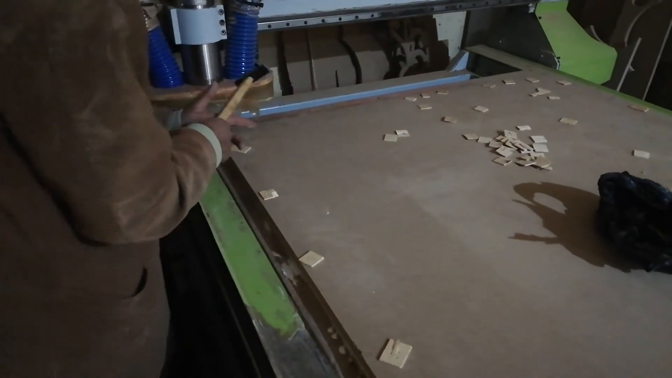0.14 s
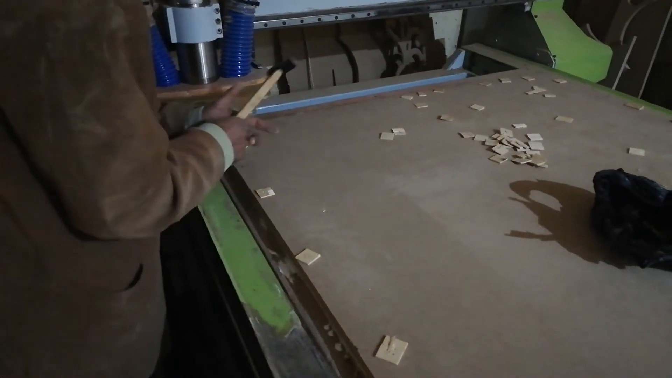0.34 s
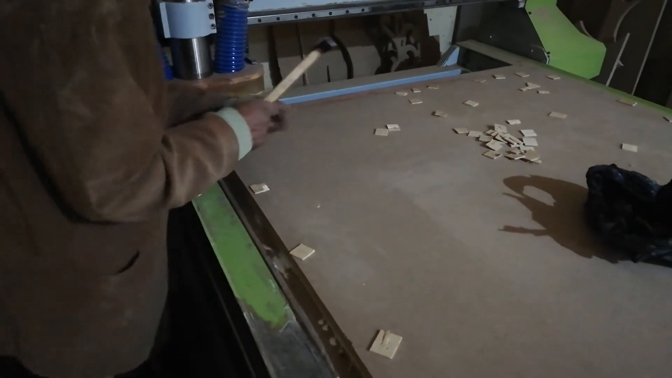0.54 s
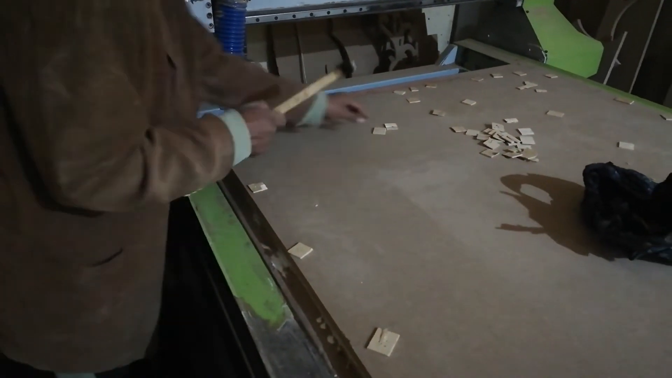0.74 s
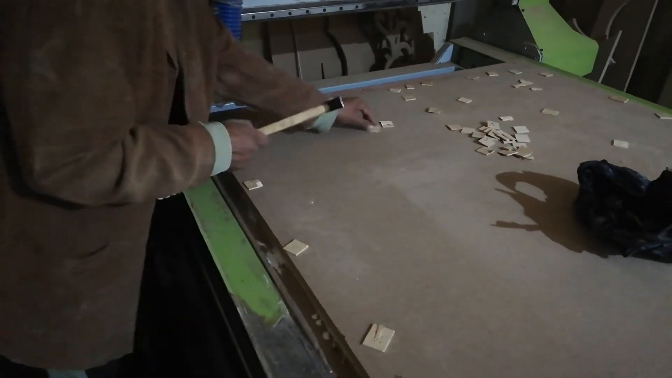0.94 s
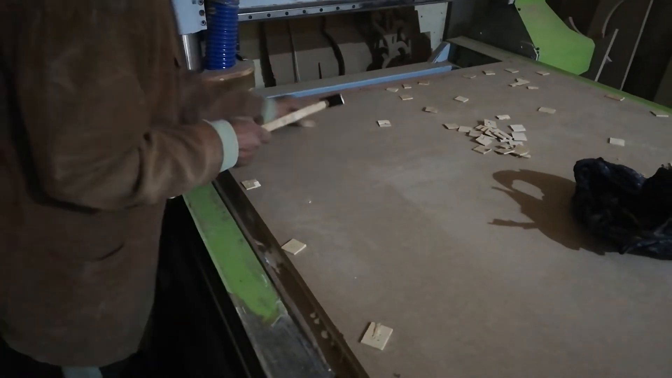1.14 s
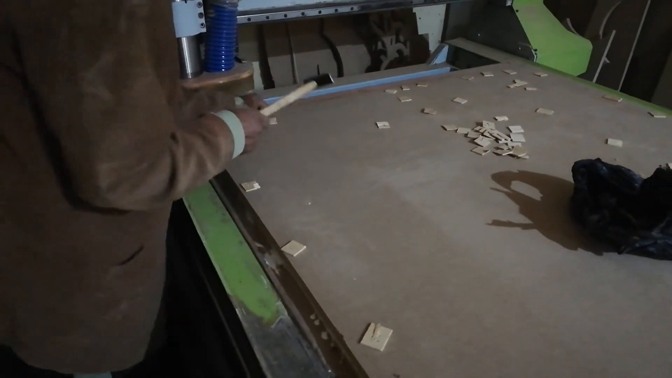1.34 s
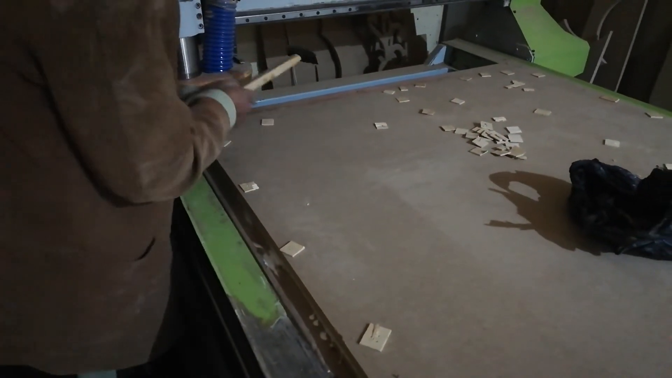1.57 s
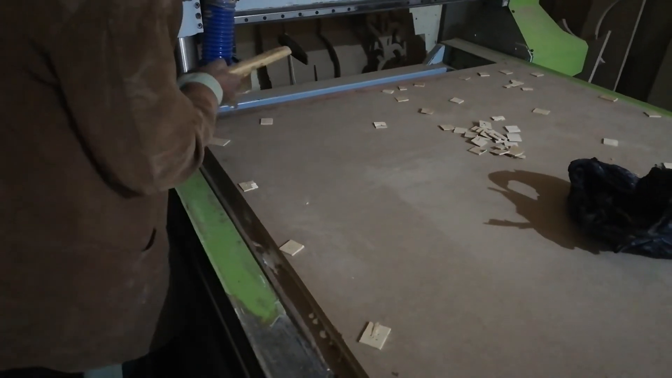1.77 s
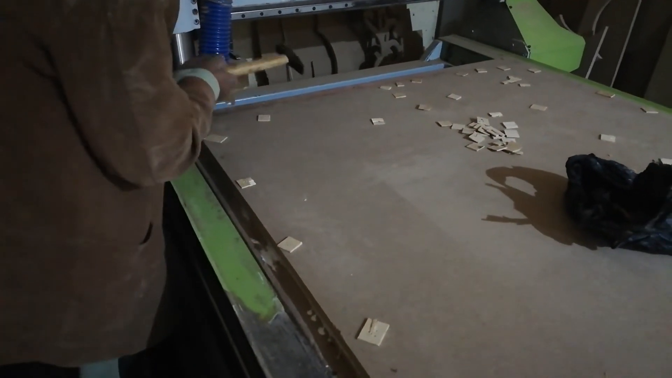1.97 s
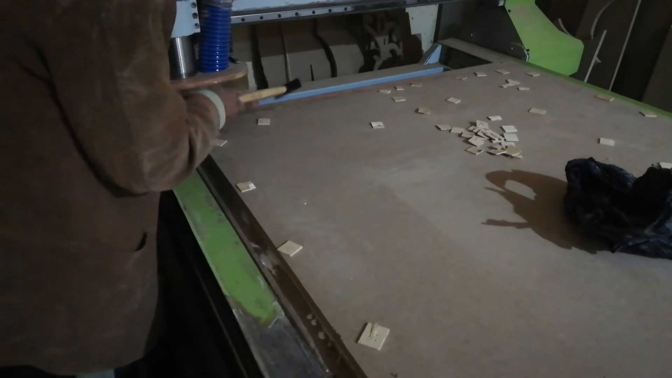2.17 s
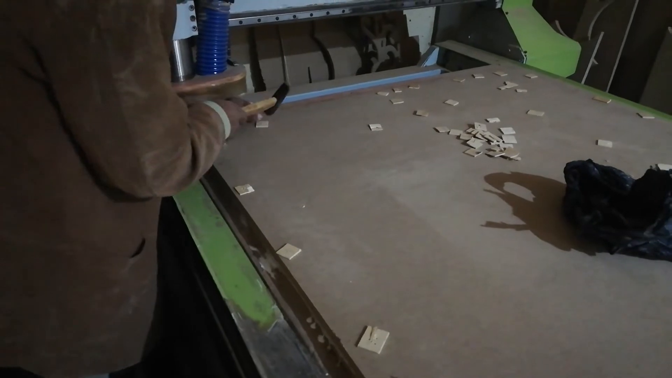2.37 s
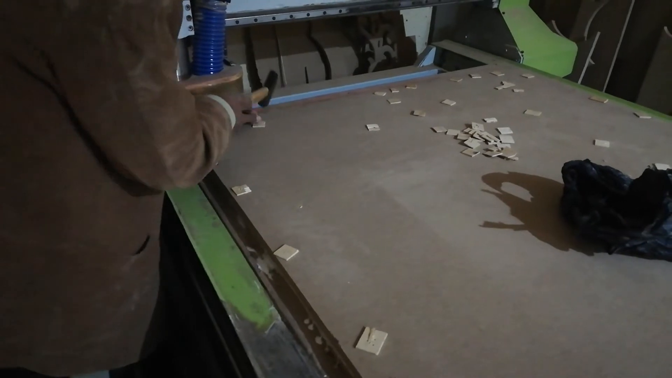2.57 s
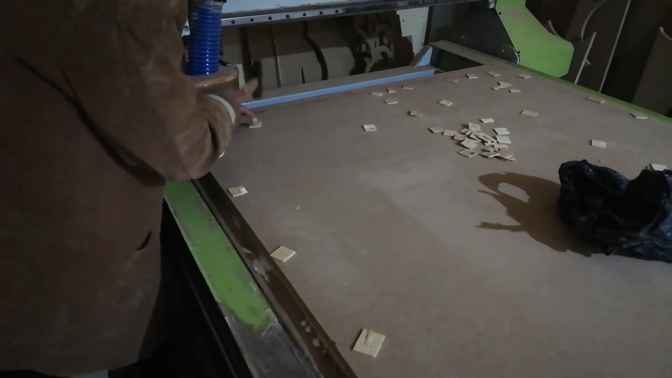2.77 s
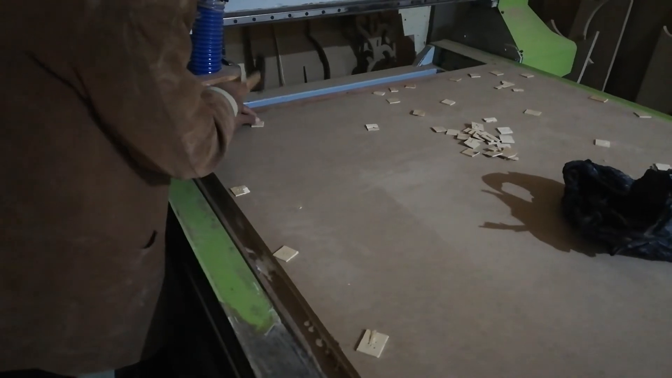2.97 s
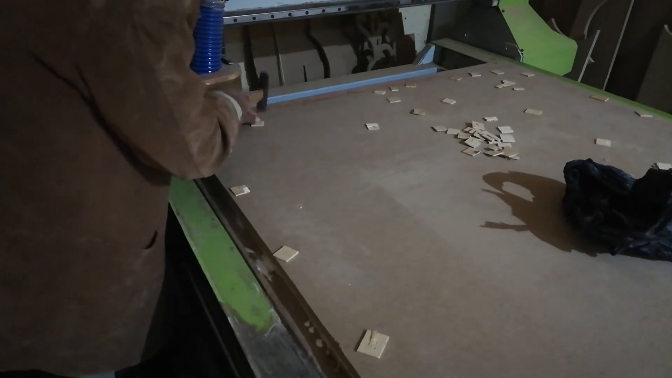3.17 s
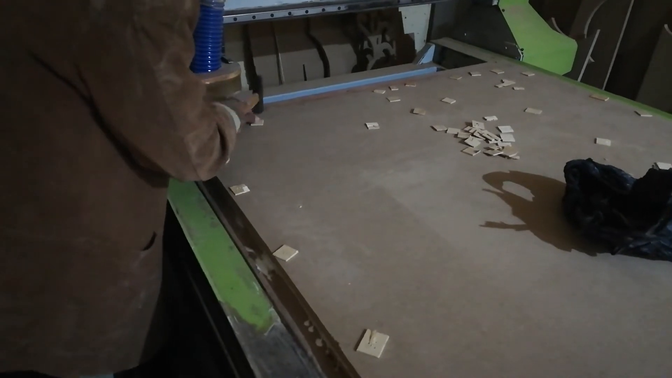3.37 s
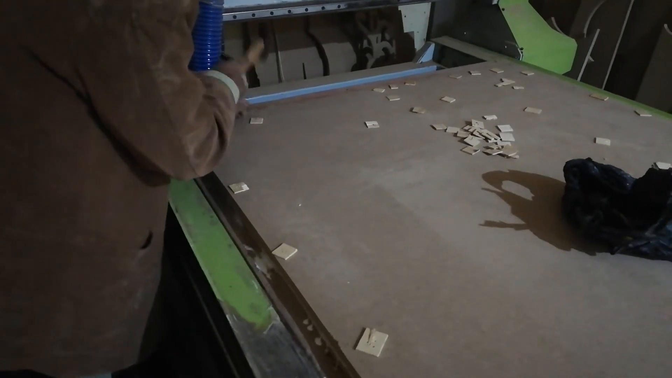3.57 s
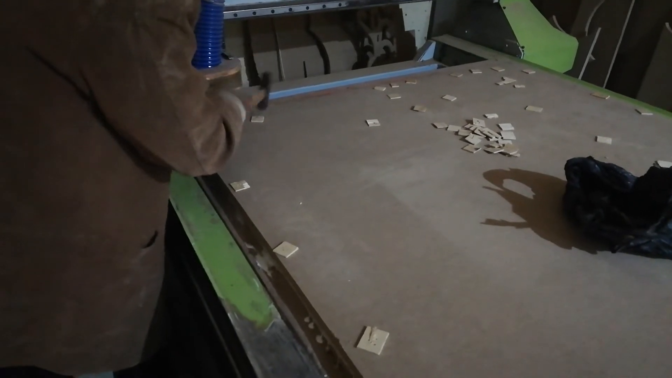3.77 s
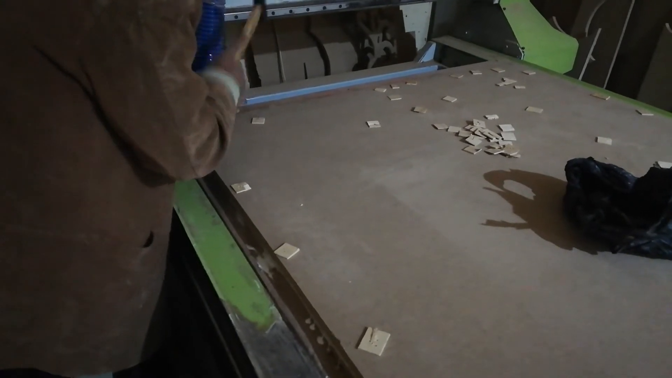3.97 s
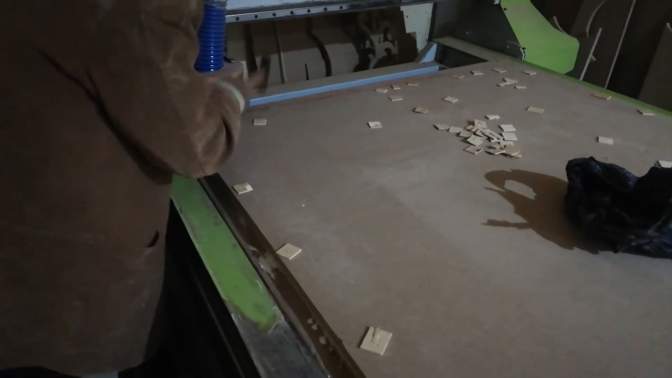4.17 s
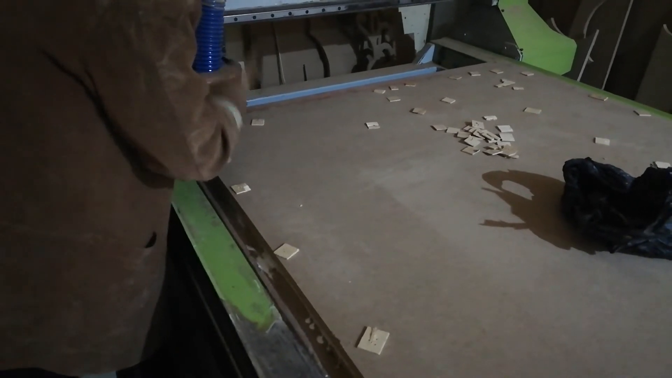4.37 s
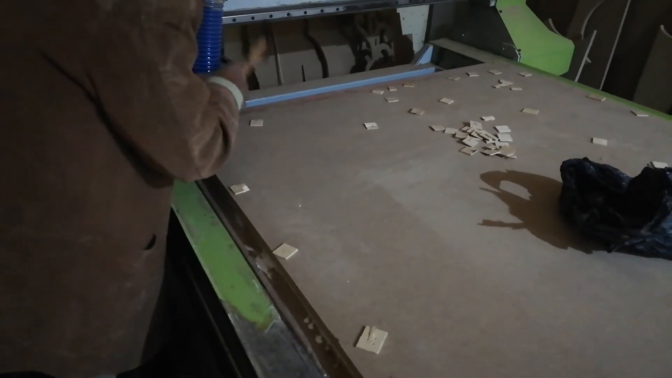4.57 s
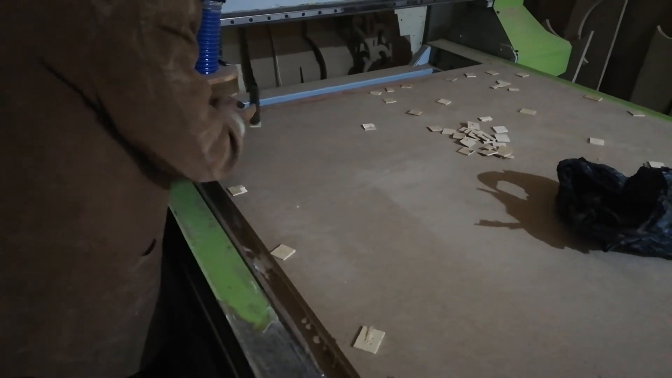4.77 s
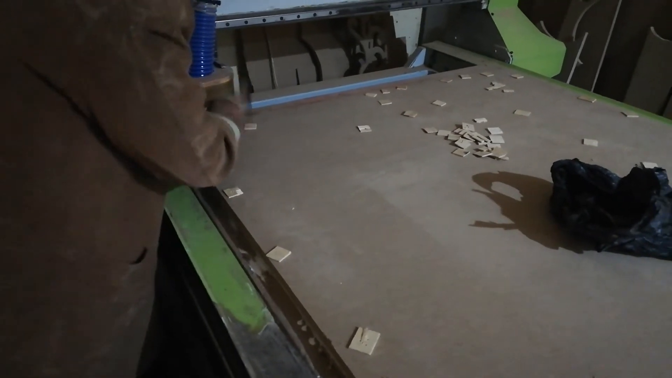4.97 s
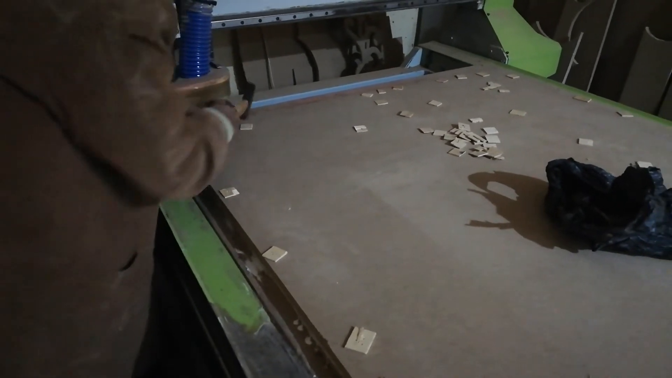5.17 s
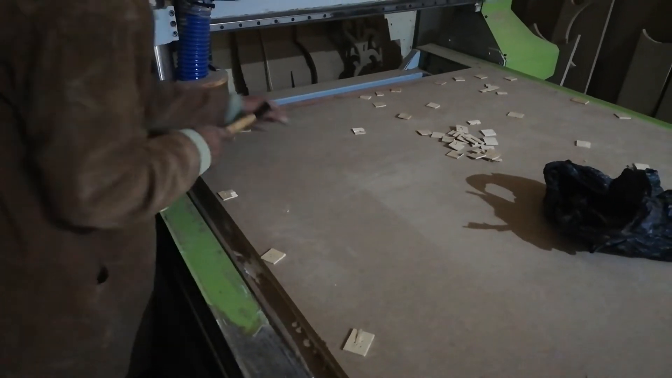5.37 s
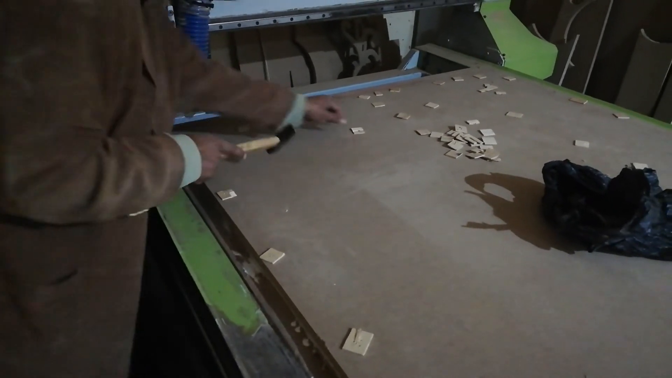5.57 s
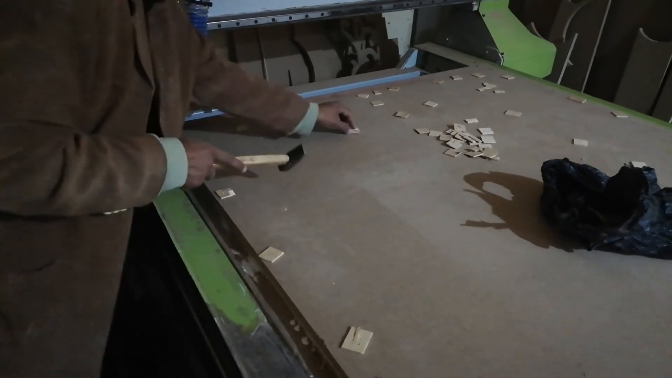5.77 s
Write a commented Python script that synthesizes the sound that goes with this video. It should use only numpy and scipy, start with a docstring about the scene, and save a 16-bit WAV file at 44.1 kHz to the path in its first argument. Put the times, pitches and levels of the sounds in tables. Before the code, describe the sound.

A quiet, unsteady low workshop hum with soft hiss runs throughout. Around 0.4 s a sleeve gives a very faint swish; another gentle rustle rises from about 1.3 s, with a tiny wooden tick near 1.65 s and a clearer brush at 1.8 s. From 2.06 s a small steel hammer strikes a wooden board eight times, roughly every third of a second, until 4.3 s. The first is a faint tap, the next ones firmer, the middle ones hard and bright, the last two heavier, the final one woodiest and deepest. Quick treble echoes and a low, booming room tail follow each. After the decay, faint cloth noise leads to a strong airy sleeve swish at 5.2-5.7 s, a grainy hand rub, a cluster of wooden clicks near 5.4-5.55 s, and soft low floor thuds. Last small ticks come around 5.75 s. The left channel is muffled, the right open; loud blows are compressed.

```python
"""Over steady workshop noise a sleeve swishes, filtered friction noise, and a wooden piece ticks.
From 2 s a small hammer strikes a board on a machine bed eight times: noise bursts and dying modes,
answered by discrete echoes, standing waves and a diffuse tail. Then the sleeve swishes again, the floor
swells as weight shifts, and a hand rubs over the bed while wooden pieces tick as the worker reaches.
Two microphone ports hear this, the left one covered; a gain control ducks both at loud moments."""
import sys
import numpy as np
from scipy import signal
from scipy.fft import rfft, irfft, next_fast_len
from scipy.io import wavfile
from scipy.ndimage import uniform_filter1d

SR = 44100
rng = np.random.default_rng(int(sys.argv[2]) if len(sys.argv) > 2 else 0)


def gain_from_db(level_db):
    """Turn a decibel level (scalar or array-like) into a linear amplitude factor."""
    decades = np.asarray(level_db, float) / 20
    return 10 ** decades


def inscribe(sig):
    """Save sig as 16-bit PCM at rate SR to the path in sys.argv[1].

    A 1-D sig is mono; a 2-D sig holds one channel per row.
    Samples are clipped to [-1, 1] before scaling.
    """
    pcm = np.round(np.clip(np.atleast_2d(sig).T, -1, 1) * 32767)
    wavfile.write(sys.argv[1], SR, pcm.astype(np.int16))


N = 256662  # samples


def read(points, hz):
    """Interpolates a table linearly over log frequency."""
    f, value = np.transpose(points)
    return np.interp(np.log(hz + 1), np.log(f + 1), value)


def shape(x, gain):
    """Linear filtering: multiplies the spectrum by gain(Hz); a real gain adds no delay."""
    size = next_fast_len(x.shape[-1] + 2048)
    return irfft(rfft(x, size) * gain(np.fft.rfftfreq(size, 1 / SR)), size)[..., :x.shape[-1]]


def above(hz, low_hz, order):
    """High-pass magnitude response; order is the power of frequency under the root."""
    return 1 / np.sqrt(1 + (low_hz / (hz + 1)) ** order)


def evened(x):
    """Normalizes the mean power: rms 1."""
    return x / np.sqrt(np.mean(x ** 2) + 1e-20)


def add(mix, s, sound):
    """Superposition: adds a sound to the mix from s seconds on."""
    part = mix[:, round(s * SR):][:, :sound.shape[-1]]
    part += sound[..., :part.shape[1]]


def air():
    """Stationary coloured noise: workshop hum and hiss whose bass fluctuates in lumps."""
    # spectrum of the workshop noise: f/Hz, relative level/dB
    air_spectrum = [(15, -69), (25, -2), (59, -2.5), (92, -11.5), (180, -13), (300, -18.5), (440, -23.5),
                    (600, -23.5), (902, -22.5), (3000, -32), (5000, -35.5), (9500, -36), (16000, -41)]
    hz, t, z = signal.stft(rng.standard_normal((2, N)), SR, nperseg=1024)
    lumps = uniform_filter1d(rng.standard_normal(z.shape[1:]), 4, 0)
    lumps = evened(uniform_filter1d(lumps, 6, 1))
    bass_share = 1 / (1 + (hz[:, None] / 300) ** 2)
    z = z * gain_from_db(read(air_spectrum, hz)[:, None] + 2.4 * lumps * bass_share)
    noise = evened(signal.istft(z, SR, nperseg=1024)[1][:, :N])
    return noise * gain_from_db(-52.5)


def step(db, hz):
    """Damped floor oscillation: weight shifts as a soft low swell."""
    t = np.arange(SR // 4) / SR
    return gain_from_db(db) * np.sin(2 * np.pi * hz * t) * (t / 0.026) * np.exp(1 - t / 0.03)


def friction(t, hiss_db, rub_db, peak_hz):
    """Stick-slip friction: an airy hiss and a grainier rub with a raised band around peak_hz."""
    # colour of the hiss: f/Hz, relative level/dB
    silky = [(1000, -50), (4000, -19), (4700, -18), (5500, -20.5), (6800, -13.5), (7700, -14), (9200, -9.5),
             (10200, -13.5), (12500, -15.5), (16000, -22.5)]
    # colour of the rub: f/Hz, relative level/dB
    rubbing = [(500, -4), (1200, -11), (2300, -5), (4500, -10), (6000, 1), (11000, -15), (16000, -3.5)]
    snags_per_s, snag_decay_s = 500, 0.00061
    snags = (rng.random(len(t)) < snags_per_s / SR) * rng.exponential(1, len(t))
    snags = signal.lfilter([1], [1, -np.exp(-1 / (snag_decay_s * SR))], snags)  # fibres catch and let go
    noise = rng.standard_normal((2, 2, len(t)))
    hiss = evened(shape(noise[0] * (1 + 0.11 * snags), lambda hz: gain_from_db(read(silky, hz))))

    hz, frames, z = signal.stft(noise[1] * (1 + 0.5 * snags), SR, nperseg=256)
    octaves = np.log2((hz[:, None] + 1) / np.interp(frames + t[0], t, peak_hz))
    raised_db = 4.3 * np.exp(-.5 * (octaves / 0.68) ** 2)
    z = z * gain_from_db(read(rubbing, hz)[:, None] + raised_db)
    rub = evened(signal.istft(z, SR, nperseg=256)[1][:, :len(t)])
    faded = (gain_from_db(hiss_db) * hiss + gain_from_db(rub_db) * rub) * signal.windows.tukey(len(t), .04)
    return t[0], faded


def swish(s, db, rise_s, hold_s, fall_s):
    """Friction noise grows with speed: a sleeve speeds up, moves on a little softer, and stops."""
    edge_db, sag_db_per_s = -35, -13.5  # drop towards either end; change from full speed on
    t = np.arange(-rise_s, hold_s + fall_s, 1 / SR)
    ends = (np.minimum(t, 0) / rise_s) ** 2 + (np.maximum(t - hold_s, 0) / fall_s) ** 2
    db = db + edge_db * ends + sag_db_per_s * np.maximum(t, 0)
    return friction(s + t, db, db - 12, np.full(len(t), 2880))  # the rub is the coarser part of the cloth


def slide():
    """Speed-dependent friction: the hand rubs over the bed without the airy hiss, speeds up and slows."""
    # course of the hand: t/s, level/dB, centre of the raised band f/Hz
    hand_course = [(5.15, -60, 2020), (5.33, -51, 3800), (5.43, -37.5, 4300), (5.49, -39.5, 2800),
                   (5.61, -40, 2100), (5.72, -53, 2030), (5.82, -66, 3040)]
    s, db, hz = np.transpose(hand_course)
    t = np.arange(s[0], s[-1], 1 / SR)
    return friction(t, -np.inf, np.interp(t, s, db), np.interp(t, s, hz))


def piece(db, hz):
    """Impact on a small resonator: a wooden piece gives a broad crack and one short ring."""
    t = np.arange(1500) / SR
    crack = shape(rng.standard_normal(len(t)) * np.exp(-t / 0.0022),
                  lambda hz: above(hz, 1500, order=4) / np.sqrt(1 + (hz / 6000) ** 2))
    tone = np.sin(2 * np.pi * hz * t) * np.exp(-t / 0.0049)
    return gain_from_db(db) * (0.5 * crack + 0.4 * tone)


def hall():
    """Diffuse reverberation: two noise tails build up fast and die band by band."""
    # reverberation time: f/Hz, T60/s
    hall_t60 = [(60, 1.006), (160, 1.12), (280, 0.55), (420, 0.65), (1100, 0.69), (2900, 0.63),
                (6000, 0.57), (9000, 0.46), (12000, 0.3), (15000, 0.31)]
    # colour of the tail: f/Hz, relative level/dB
    hall_colour = [(50, -0.5), (150, 4.5), (400, 14.5), (1000, 5), (3000, 1.5), (6000, -2), (9000, 0),
                   (15000, -9)]
    far_db, far_t60, build_up_s = -26, 1.5, 0.0051
    hz, t, z = signal.stft(rng.standard_normal((2, 2 * SR)), SR, nperseg=256)
    near = gain_from_db(-60 * t / read(hall_t60, hz)[:, None])
    # the far end of the workshop answers faintly and lasts longer
    far = gain_from_db(far_db - 60 * t / far_t60) / (1 + (hz[:, None] / 9000) ** 4)
    tail = signal.istft(z * np.hypot(near, far), SR, nperseg=256)[1]
    tail = tail * (1 - np.exp(-np.arange(tail.shape[1]) / SR / build_up_s))
    return shape(tail / np.linalg.norm(tail[0]), lambda hz: gain_from_db(read(hall_colour, hz)))


def ring(modes, tilt_db, spread_db, rise_s):
    """Modal superposition: dying sines, neighbours in opposite sense; a positive tilt lifts the upper ones."""
    t = np.arange(SR) / SR
    hz, db, t60 = np.transpose(modes)[:, :, None]
    level, detune = rng.standard_normal((2, len(modes), 1))
    db = db + tilt_db * np.log2(hz / hz.mean()) + spread_db * level
    sines = gain_from_db(db - 60 * t / t60) * np.sin(2 * np.pi * hz * (1 + 0.017 * detune) * t)
    signed_sum = sines[::2].sum(0) - sines[1::2].sum(0)
    return signed_sum * (1 - np.exp(-t / rise_s)) / np.sqrt(len(modes))


def steel_tick():
    """Short contact, high spectrum: the steel's burst of treble noise."""
    t = np.arange(SR) / SR
    return shape(rng.standard_normal(SR) * np.exp(-t / 0.0034),
                 lambda hz: above(hz, 15000, order=4) / np.sqrt(1 + (hz / 11000) ** 6))


def contact(hz, low_hz, hard_db):
    """Contact spectrum: a harder blow, in dB per octave, tilts the wood's response to the treble."""
    tilt = gain_from_db(hard_db * np.log2((hz + 1) / 2000)) / np.sqrt(1 + (hz / 2500) ** 2)
    return above(hz, low_hz, order=4) * tilt


def splinter(hard_db):
    """Crushing noise: fibres give way under the steel."""
    t = np.arange(600) / SR
    return shape(rng.standard_normal(600) * np.exp(-t / 0.0035), lambda hz: contact(hz, 410, hard_db))


def click_twice(knock_db, lead):
    """Repeated contact: above a knock level of -15.5 dB the loose board touches a second time."""
    gap_s = .0011
    chatter = np.clip(12 * (knock_db + 15.5), 0, .3)  # share of the first touch
    second = signal.unit_impulse(SR, lead + round(gap_s * SR))
    return signal.unit_impulse(SR, lead) + chatter * second


def add_echoes(out, source, lead):
    """Early reflection: each surface returns one band of the source after its path delay."""
    # single reflections: delay t/s, relative level/dB, centre f/Hz, width of the returned band f/Hz
    surfaces = [(.0025, -46, 5800, 2940), (0.0168, -38, 5000, 4000), (0.0231, -14.5, 11700, 3440),
                (0.0263, 10.5, 8400, 1600), (0.0292, 2, 8200, 1500), (0.0328, 2, 7200, 3000),
                (0.0562, 0, 7400, 1805), (0.0596, -1, 7500, 1500)]
    t = np.arange(60) / SR
    for delay, db, centre_hz, width_hz in surfaces:
        echo = shape(source[:512], lambda hz: np.exp(-.5 * ((hz - centre_hz) / width_hz) ** 2))
        rough = rng.standard_normal(60) * np.exp(-t / 0.0001)  # no surface is flat
        add(out, delay - lead / SR, gain_from_db(db) * np.convolve(echo, rough / np.linalg.norm(rough)))


def blow(tick_db, knock_db, hard_db, thump_db, lasting):
    """Impact excitation: tick, knock and thump set off the echoes and a tail that varies from blow to blow."""
    # modes of the struck board: nominal f/Hz, relative level/dB, T60/s
    board_modes = [(538.4, 12.5, 0.043), (737, 19.5, 0.021), (924, 12, 0.059), (1144.5, 0, 0.069),
                   (1296, 10, 0.047), (1500, 0, 0.094), (1940, -19, 0.049), (2300, -5, 0.032),
                   (2755, -4.5, 0.02), (3348, 0, 0.01), (4080, 14, 0.015), (4700, -7, 0.0067)]
    # modes of the machine bed under it: nominal f/Hz, relative level/dB, T60/s
    bed_modes = [(59, 3.5, 0.037), (88.6, 0, 0.083), (124, -1, 0.041), (139.4, -6.5, 0.14),
                 (168, -16, 0.11), (211.2, -3.5, 0.046), (280.4, -12.5, 0.071), (350.2, -7.5, 0.063),
                 (368.5, -2.5, 0.035)]
    # standing waves of the workshop: nominal f/Hz, relative level/dB, T60/s
    standing_modes = [(112.85, -2.5, 1.18), (148.4, -7.5, 1.26), (176.3, -3.5, 1.22), (186, -13, 1.43),
                      (279.5, -4.5, 0.59), (389, -16.5, 0.29)]
    lead = 64  # samples ahead of the click, room for the zero-phase filters
    tight_db = 0.3579 * (thump_db + 10)  # dB/octave: a heavier thump favours the upper bed modes
    thump = gain_from_db(thump_db) * ring(bed_modes, tight_db, 0.17, 0.0023)
    board = gain_from_db(knock_db) * ring(board_modes, hard_db, 0.82, 0.0018)
    click = click_twice(knock_db, lead)
    # summed over all directions the gaps between the board's modes fill in
    knock = gain_from_db(knock_db + 22) * shape(click, lambda hz: contact(hz, 267, hard_db))
    glint = gain_from_db(tick_db + 20.0) * shape(click, lambda hz: above(hz, 11900, order=4))

    tail = 0.88 * lasting + 0.87 * hall()
    out = signal.fftconvolve((knock + glint + thump)[None], tail, axes=1)[:, lead:]
    # the modes reach the walls by other paths
    add(out, 0, gain_from_db(-19.5) * signal.fftconvolve(board[None], hall(), axes=1))
    add(out, 0, gain_from_db(tick_db) * steel_tick() + gain_from_db(-7.5) * board + gain_from_db(4.5) * thump)
    add(out, 0, gain_from_db(thump_db - 6.5) * ring(standing_modes, tight_db, 1, 0.009))
    add(out, 0, gain_from_db(knock_db + 3.5) * splinter(hard_db))
    add_echoes(out, knock + gain_from_db(-17) * glint, lead)
    return out


def scene():
    """Two samplings of a diffuse field: what only the covered port meets, then the open port."""
    # hammer blows: t/s, then relative levels: steel tick level/dB, board knock level/dB,
    # hardness/(dB/octave), bed thump level/dB
    blows = [(2.0590, -12, -44, -4.5, -27.5), (2.3217, -3, -19, -3, -12.5), (2.5736, -4, -9, -1.1, -10),
             (2.9371, -1, -5, 2, -10.5), (3.2658, 3, -4, 2.5, -7.5), (3.6264, 1.5, -2, 3.5, -7),
             (3.9690, 2, -2.5, 0, -0.5), (4.3004, -4.5, 7, -1.5, 4.5)]
    # sleeve movements: t/s at full speed, hiss level/dB, rise t/s, hold t/s, fall t/s
    swishes = [(0.399, -56.5, 0.085, 0.076, .13), (1.561, -60.5, 0.37, 0.053, 0.39),
               (1.835, -49, .09, 0.019, 0.25), (4.716, -59, 0.062, 0.38, 0.25), (5.344, -36, .2, .26, .13),
               (5.735, -48, .08, 0.013, 0.18)]
    # wooden pieces touched: t/s, relative level/dB, ring f/Hz
    ticks = [(1.6594, -47, 1650), (5.4072, -27, 1840), (5.407, -19, 4700), (5.4254, -23.5, 4550),
             (5.428, -33, 9000), (5.4332, -28, 4470), (5.440, -26, 4700), (5.4878, -25.5, 2300),
             (5.531, -29.5, 2500), (5.742, -31, 9260), (5.762, -42, 9100)]
    # weight shifting on the floor: t/s, relative level/dB, f/Hz
    steps = [(4.97, -44, 52.6), (5.2, -51, 53), (5.341, -48, 53), (5.59, -45, 54.7), (5.711, -41.5, 55.3)]
    mix, lasting = air(), hall()  # all blows share the lasting part of the tail
    for s, db, hz in steps:
        add(mix, s, step(db, hz))
    for row in swishes:
        add(mix, *swish(*row))
    add(mix, *slide())
    for s, db, hz in ticks:
        add(mix, s, piece(db, hz))
    for s, *strength in blows:
        add(mix, s, blow(*strength, lasting))
    return mix[::-1]


def covered_port(dry):
    """Partial coherence and acoustic low-pass: the covered left port hears late and dull."""
    # likeness of the two ports: f/Hz, coherent share/1
    likeness = [(100, .995), (350, .98), (800, .85), (1500, .92), (3000, .88), (5000, .6), (8500, .85),
                (12000, .55)]
    # colour of the cover: f/Hz, relative level/dB
    cover_colour = [(60, 0), (200, 1.5), (400, 1), (750, -3.5), (1400, -1), (3000, -3.2), (5000, -6),
                    (9000, -11), (13000, -41)]
    cover_hz, vent_hz, lag = 390, 26, 23  # low-pass corner, high-pass corner, delay in samples

    def same(hz):
        """Amplitude share of the open port's field."""
        return np.clip(read(likeness, hz), 0, 1)

    def cover(hz):
        """Response of the cover: delay, low-pass and vent."""
        late = np.exp(-2j * np.pi * hz * lag / SR)
        return gain_from_db(read(cover_colour, hz)) * late / (1 + 1j * hz / cover_hz) / (1 - 1j * vent_hz / (hz + 1))

    left = shape(dry[1], same) + shape(dry[0], lambda hz: np.sqrt(1 - same(hz) ** 2))
    return shape(left, cover)


def port_resonance(both):
    """Cavity resonance: both ports colour what they hear."""
    # response of a port: f/Hz, relative level/dB
    port_colour = [(20, -4), (100, 2.06), (3500, 8), (4600, 4.5), (5600, 1), (7500, 1), (9200, 3.5),
                   (10500, -1.5), (12500, -4), (16000, -15.5)]
    return shape(both, lambda hz: gain_from_db(read(port_colour, hz)))


def hiss():
    """Electronic self-noise: independent in each channel, falling towards the treble."""
    white = gain_from_db(-56.5) * rng.standard_normal((2, N))
    return shape(white, lambda hz: 1 / np.sqrt(1 + hz / 1500) / np.sqrt(1 + (hz / 6000) ** 4))


def gain_control(both):
    """Feed-forward compression: power above -17 dB in the louder channel ducks both."""
    power = signal.lfilter([.01], [1, -.99], (both ** 2).max(0))
    fall = np.arange(N) * 50.0 / SR  # recovers at 50 dB/s
    over_db = 0.6 * np.maximum(10 * np.log10(power + 1e-12) + 17, 0)
    cut_db = np.maximum.accumulate(over_db + fall) - fall
    cut_db = signal.lfilter([.06], [1, -.94], cut_db)  # smooths over less than a millisecond
    return both / gain_from_db(cut_db)


def top_cut(x):
    """Nothing passes above the cut-off."""
    return signal.sosfilt(signal.butter(12, 16510, fs=SR, output="sos"), x)


def record(dry):
    """Transduction: covered left and open right port, resonance, hiss, gain control and clipping."""
    both = port_resonance(np.array([covered_port(dry), dry[1]]))
    both = gain_control(both + hiss())
    finished = np.clip(both, -1, 1)
    return top_cut(finished)


dry = scene()
out = record(dry)
inscribe(out)
```